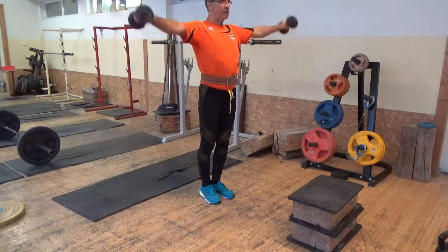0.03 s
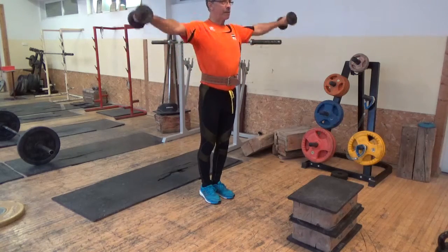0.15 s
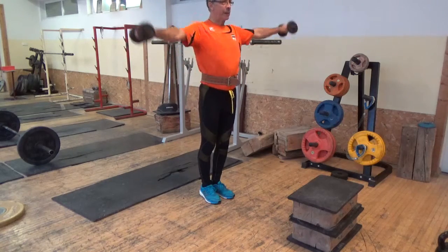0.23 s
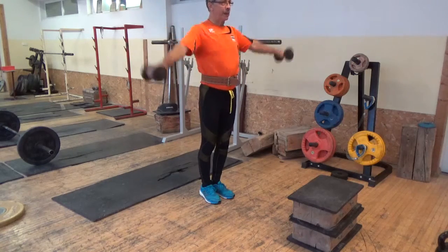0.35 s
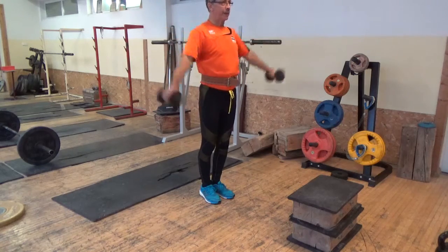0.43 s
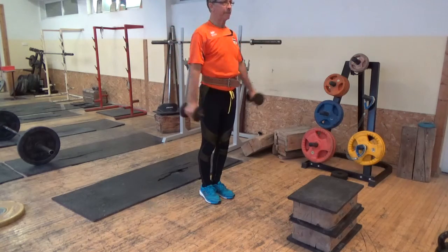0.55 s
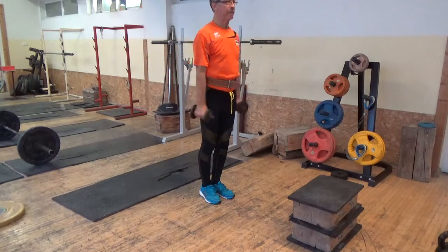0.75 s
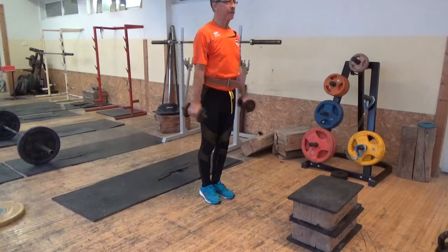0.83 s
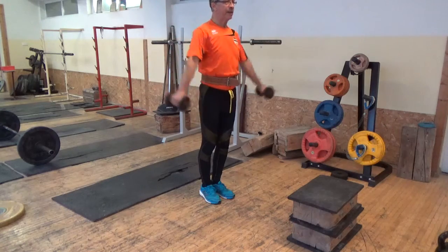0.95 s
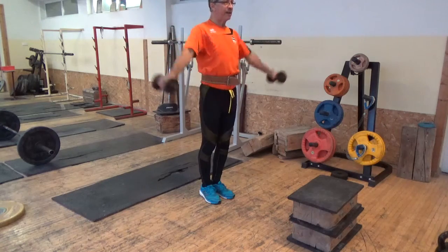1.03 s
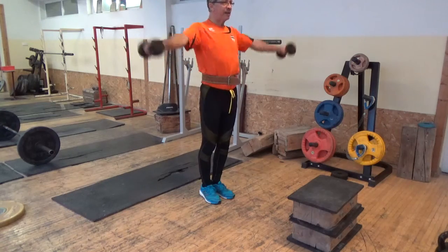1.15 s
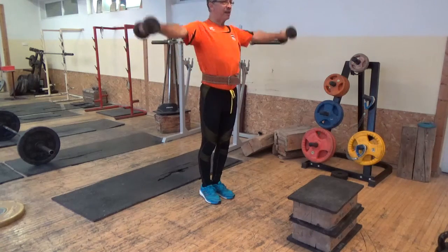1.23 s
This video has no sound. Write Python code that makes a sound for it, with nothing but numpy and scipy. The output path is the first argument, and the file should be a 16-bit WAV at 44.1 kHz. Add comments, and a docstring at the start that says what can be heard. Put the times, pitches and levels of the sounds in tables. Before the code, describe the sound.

Loose steel dumbbell plates clatter quickly, then knock once more, echoing through a gym.

```python
"""Rustling clothes, ventilation noise and mains hum fill an echoing gym as an earlier clank dies away.
Two steel dumbbells are lowered and raised. Their loose plates tick on the handles, tip against each
other in a quick run of clanks, ring on with a thin high tone, and knock once more at the bottom of
the swing. Each clank is a click and a short chatter, plus the fading tones of the struck plates.
The rustle and the ventilation are shaped noise; the hum and the high ring are wavering tones."""
import sys
import numpy as np
from scipy import signal
from scipy.fft import rfft, irfft, next_fast_len
from scipy.io import wavfile
from scipy.ndimage import map_coordinates

SR = 44100
rng = np.random.default_rng(int(sys.argv[2]) if len(sys.argv) > 2 else 0)


def to_wav(s):
    """Save 16-bit WAV."""
    ch = np.atleast_2d(s).T  # columns
    pcm = np.round(np.clip(ch, -1, 1) * 32767)  # PCM
    wavfile.write(sys.argv[1], SR, pcm.astype(np.int16))


N = 57330

# loudness of the rustle as the arms swing past the hips: t/s, level/dB
RUSTLE_LEVEL = [(.4, -49.5), (.58, -46), (.72, -43), (0.879, -48.5), (1.05, -55.5), (1.2, -83)]
# tone colour of the rustle: f/Hz, relative level/dB
RUSTLE_COLOUR = [(30, -15.5), (90, -11), (160, -19), (280, -1), (420, -9.5), (610, 2), (800, -6),
                 (1500, -1), (4000, -14.5), (11000, -27)]
# tone colour of the ventilation: f/Hz, relative level/dB
AIR_COLOUR = [(20, -30), (38, -26), (55, 0.5), (75, -24), (130, 1), (185, -2), (220, -7.5), (300, 0),
              (430, -11.5), (600, -9), (1200, -9.5), (2200, -25.5), (4000, -22), (7000, -26.5),
              (11000, -28)]
# tones of the hum: f/Hz, level/dB
HUM_TONES = [(100, -58.5), (179, -63.5), (201, -63.5), (255, -68), (301, -63), (351, -66)]
# plate hitting plate, first on the swing before: t/s, level/dB, knock/dB, crack/dB, tones/dB, chatter/dB
PLATE_HITS = [(-.42, -23.5, 11.5, -35, 8.5, -6.5), (0.2285, -17.5, -7, -4, 3, -2.5),
              (0.2357, -24, -6, 4.5, -10, 5), (0.2443, -22, -7, 2, -7, 0), (0.2546, -24.5, 3.5, 6.5, 6, 6),
              (0.2942, -21, -3, -3, 1, 4), (.306, -22.5, -5.5, -2, 7, 7), (0.3224, -17.5, 7, -3, -2, -10),
              (0.3656, -20, -4.5, 8, 4.5, 2), (.371, -19.5, -7, 7, 9, 2.5), (.382, -23, -22, 6.5, 12, 5),
              (.428, -21, 4, -5, -1, -9.5), (0.7494, -24, 6.5, 2, -4, 2.5),
              (0.81, -39.5, 10.5, -4, -13, 2.5), (.85, -35.5, 10.5, -23, -11, 2)]
# tone colours of a hit's low knock, middle clang and high crack: f/Hz, relative level/dB
KNOCK_COLOUR = [(100, -39), (400, -17.5), (600, -10.5), (850, -1.5), (1100, 6), (1400, 0), (2000, -1),
                (3200, -22), (6000, -25), (11000, -36)]
CLANG_COLOUR = [(100, -35), (600, -21), (1200, -8.5), (1950, 3.5), (2500, 1), (2850, 3.5), (3200, 2.5),
                (3650, -11.5), (4800, -13), (6500, -20), (11000, -42)]
CRACK_COLOUR = [(100, -21.5), (1500, -22), (3500, -11.5), (4500, -11), (5400, -17), (5900, -11),
                (6700, -14.5), (7800, -16.5), (9000, -12.5), (9800, -20), (10500, -11.5), (11200, -47)]
# natural tones of the plates: f/Hz, relative level/dB, fade time/s (the time to drop by 60 dB)
PLATE_TONES = [(1175, -23, .25), (1310, -21, .25), (1570, -22, .12), (1920, -21, .15), (2222, -23, .2),
               (2566, -20, .2), (2705, -17, .1), (2865, -10, .35), (2922, -12, .25), (3012, -12, .25),
               (3106, -13, .1), (3290, -15, .12), (5290, -15, .025), (5400, -12, .06), (5470, -14, .035)]
# how long the hall echoes: f/Hz, fade time/s
HALL_FADE = [(200, 1.1), (1000, 1.28), (2000, 1.41), (3000, 1.16), (4200, 1.05), (5400, 1.03), (8000, 0.74),
             (11000, 0.45)]
# long-ringing tones of the steel: f/Hz, relative level/dB
RING_TONES = [(6407, -1), (6424, -7), (6292, -15), (6170, -23)]
# loudness of that ring: t/s, level/dB
RING_LOUDNESS = [(0, -64), (.12, -68), (.15, -65), (.22, -63), (.26, -49), (.31, -43.5), (.42, -49),
                 (.56, -44.5), (.62, -55.5), (.69, -51.5), (.71, -60), (.8, -59.5), (.86, -58),
                 (.98, -60.5), (1.01, -64), (1.3, -74.5)]
# plates ticking on the handles: t/s, level/dB, centre f/Hz, width/octaves, fade time/s
HANDLE_TICKS = [(.0865, -12, 2240, 0.16, 0.012), (.141, -25, 4960, 0.53, 0.017),
                (0.2153, -24, 1970, 0.68, 0.02)]
# stereo width: f/Hz, level of the sides against the middle/dB
STEREO_WIDTH = [(25, -19), (60, -32), (150, -22), (350, -14), (700, -10.5), (1500, -8), (4000, -8),
                (11000, -9)]


def amp(db):
    """Turn decibels into a gain to multiply by."""
    return 10 ** (np.asarray(db) / 20)


def unit(x):
    """Scale a signal to an average power of 1."""
    return x / np.sqrt(np.mean(x ** 2) + 1e-20)


def along(points, hz):
    """Read between a table's rows on a logarithmic frequency scale."""
    f, values = np.transpose(points)
    return np.interp(np.log(hz + 1), np.log(f + 1), values)


def level(points):
    """Turn rows of t/s, level/dB into a gain for every sample."""
    return amp(np.interp(np.arange(N) / SR, *np.transpose(points)))


def wobble(rate):
    """A smooth curve through `rate` random values a second."""
    return map_coordinates(rng.standard_normal(256), [np.arange(N) * rate / SR + 2], mode="wrap")


def dying(t, fade_s):
    """A curve of total energy 1 that drops 60 dB in fade_s."""
    curve = amp(-60 * t / fade_s)
    return curve / np.linalg.norm(curve)


def filtered(x, response):
    """Multiply each frequency in x by the gain response(hz)."""
    n = x.shape[-1]
    padded = next_fast_len(n + SR // 4)
    return irfft(rfft(x, padded) * response(np.fft.rfftfreq(padded, 1 / SR)), padded)[..., :n]


def click(colour):
    """A click of this tone colour, with its energy as early as possible (minimum phase)."""
    cepstrum = irfft(np.log(colour + 1e-6))
    half = len(cepstrum) // 2
    cepstrum[1:half] *= 2
    cepstrum[half + 1:] = 0
    return irfft(np.exp(rfft(cepstrum)))


def spread(pair):
    """Turn a middle and a side signal into left and right; the bass stays near the middle."""
    side = filtered(pair[1], lambda hz: amp(along(STEREO_WIDTH, hz)))
    return np.array([pair[0] + side, pair[0] - side])


def add(out, x, start_s):
    """Mix x into out from start_s on, dropping what falls outside the scene."""
    i = round(start_s * SR)
    x = x[:, max(-i, 0):N - i]
    out[:, max(i, 0):max(i, 0) + x.shape[1]] += x


def noise(colour):
    """Stereo noise of this tone colour, with power 1."""
    white = rng.standard_normal((2, N))
    return unit(spread(filtered(white, lambda hz: amp(along(colour, hz)))))


def wavering(hz, rate, depth=0.22):
    """A stereo tone whose level and phase drift in the hall."""
    tone = np.exp(2j * np.pi * (hz * np.arange(N) / SR + rng.random()))
    drift = [wobble(rate) + 1j * wobble(rate) for _ in range(2)]
    middle = unit((tone * (1 + depth * drift[0])).real)
    side = unit((tone * drift[1]).real)
    return spread([middle, side])


def rustle():
    """Clothes rustle dully, loudest at the bottom of the swing."""
    return level(RUSTLE_LEVEL) * noise(RUSTLE_COLOUR)


def ventilation(level_db=-53):
    """Moving air makes a steady rush."""
    return amp(level_db) * noise(AIR_COLOUR)


def mains_hum():
    """The electricity supply hums in a few low tones."""
    return sum(amp(db) * wavering(hz, rate=5.22) for hz, db in HUM_TONES)


def clank(knock_db, crack_db, tones_db, chatter_db):
    """Plate hits plate: a click, a short chatter, and the plates' own fading tones."""
    t, hz = np.arange(SR // 3) / SR, np.fft.rfftfreq(2048, 1 / SR)
    knock = amp(along(KNOCK_COLOUR, hz) + knock_db)
    clang = amp(along(CLANG_COLOUR, hz))
    crack = amp(along(CRACK_COLOUR, hz) + crack_db)
    colour = np.sqrt(knock ** 2 + clang ** 2 + crack ** 2)
    force = amp(chatter_db) * rng.standard_normal(len(t)) * dying(t, fade_s=0.029)
    force[0] += 1  # the blow that starts the chatter
    impact = signal.fftconvolve(force, click(colour))[:len(t)]
    tones = np.zeros(len(t))
    for f, db, fade_s in PLATE_TONES:
        gain = amp(db + 2 * rng.standard_normal())  # varies by about 2 dB from hit to hit
        tones += gain * dying(t, fade_s) * np.sin(2 * np.pi * (f * t + rng.random()))
    return amp(12.5) * impact + amp(tones_db + 10.5) * tones


def hall(tail_db=4.5, build_s=0.014, early_db=1):
    """The gym's answer to a click: direct sound, early echoes and a long tail whose treble dies first."""
    t = np.arange(2 * SR) / SR
    hz, times, bands = signal.stft(rng.standard_normal((2, len(t))), SR, nperseg=256)
    fade = amp(-60 * times / along(HALL_FADE, hz)[:, None])
    tail = signal.istft(bands * fade, SR, nperseg=256)[1][:, :len(t)]
    tail *= dying(t, fade_s=0.86)[0]  # one number that sets the tail's scale
    tail *= 1 - np.exp(-t / build_s)
    early = rng.standard_normal((2, len(t))) * dying(t, fade_s=0.082)
    response = spread(amp(tail_db) * tail + amp(early_db) * early)
    response[:, 0] += 1  # the direct sound
    return response


def steel_ring():
    """High tones of the steel lie close together and beat against each other."""
    return level(RING_LOUDNESS) * sum(amp(db) * wavering(hz, rate=13.78) for hz, db in RING_TONES)


def tick(centre_hz, octaves, fade_s):
    """A loose plate taps its handle: a click and a brief rattle around one pitch."""
    t, hz = np.arange(SR // 8) / SR, np.fft.rfftfreq(2048, 1 / SR)
    colour = 1 / (1 + (np.log2((hz + 1) / centre_hz) / octaves) ** 4)
    force = 0.86 * rng.standard_normal(len(t)) * dying(t, fade_s)
    force[0] += 1
    return amp(7.5) * signal.fftconvolve(force, click(colour))


def loose_plates():
    """Each clank and tick comes from a new place in the hall, so it gets its own echo."""
    out = np.zeros((2, N))
    sounds = [(start_s, db, clank(*blow)) for start_s, db, *blow in PLATE_HITS]
    sounds += [(start_s, db, tick(*shape)) for start_s, db, *shape in HANDLE_TICKS]
    for start_s, db, sound in sounds:
        add(out, amp(db) * signal.fftconvolve(hall(), sound[None], axes=1), start_s)
    return out


def scene():
    """The dumbbells, a little to the right, over the rustle, ventilation and hum."""
    lean_right = amp([[-0.33], [0.33]])
    dumbbells = (loose_plates() + steel_ring()) * lean_right
    return dumbbells + rustle() + ventilation() + mains_hum()


def record(dry):
    """Cut away the highest treble very steeply."""
    top_hz = 11040
    return filtered(dry, lambda hz: 1 / np.sqrt(1 + (hz / top_hz) ** 300))


dry = scene()
out = record(dry)
to_wav(out)
```